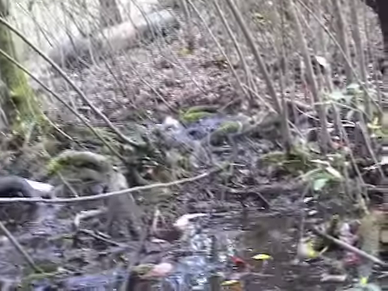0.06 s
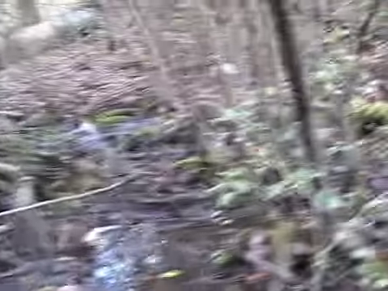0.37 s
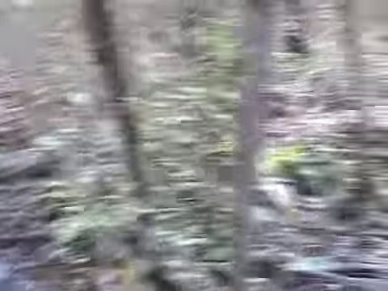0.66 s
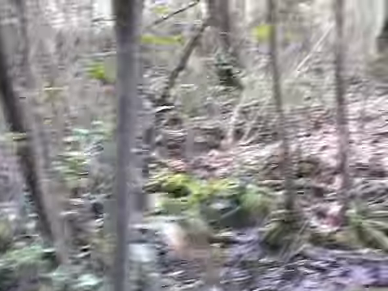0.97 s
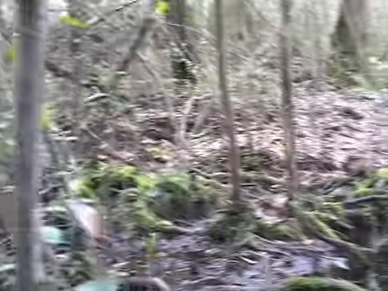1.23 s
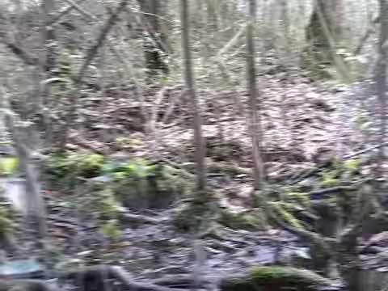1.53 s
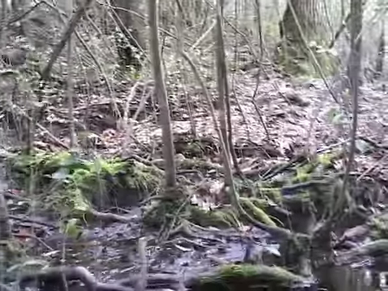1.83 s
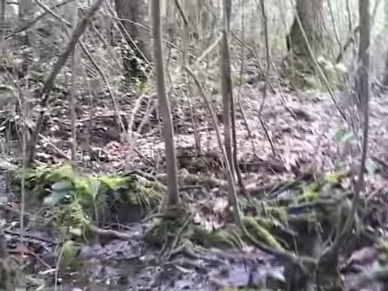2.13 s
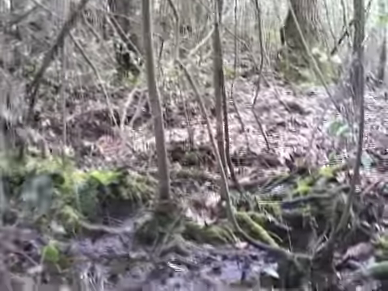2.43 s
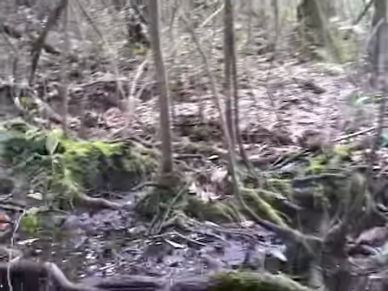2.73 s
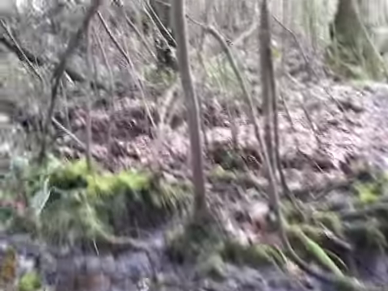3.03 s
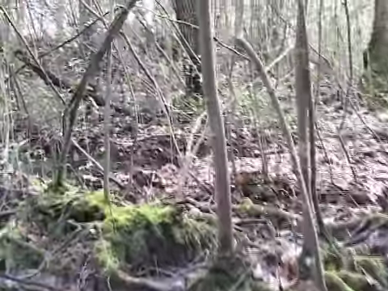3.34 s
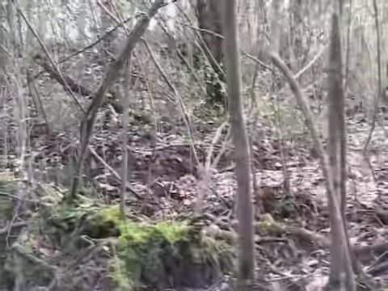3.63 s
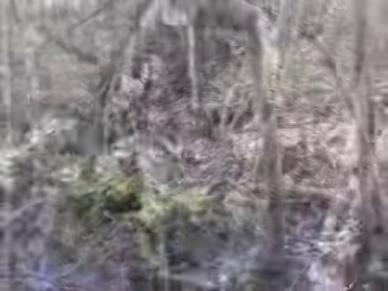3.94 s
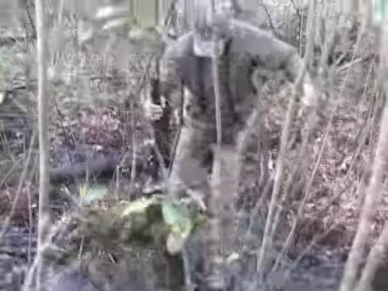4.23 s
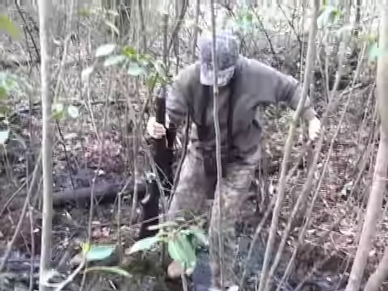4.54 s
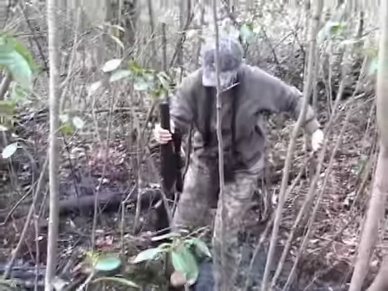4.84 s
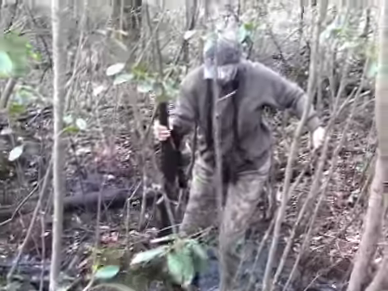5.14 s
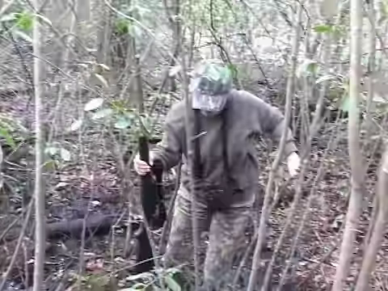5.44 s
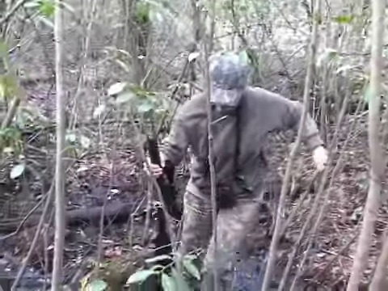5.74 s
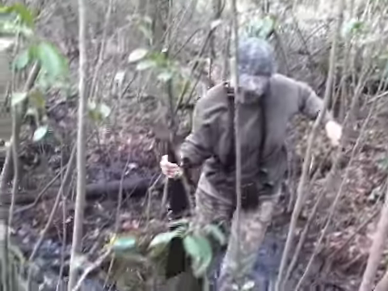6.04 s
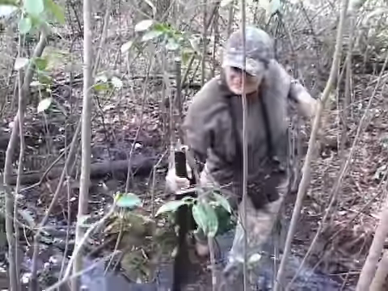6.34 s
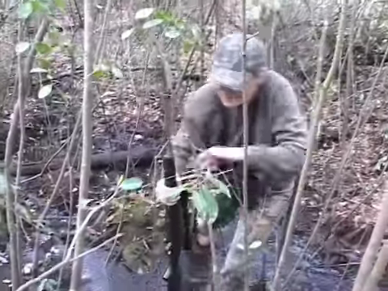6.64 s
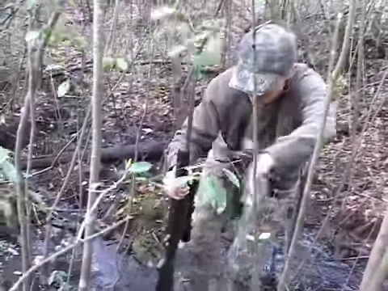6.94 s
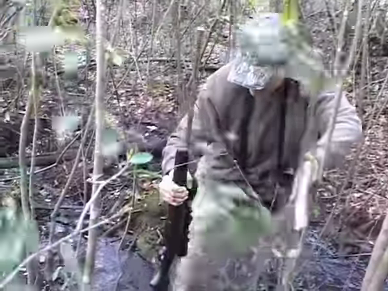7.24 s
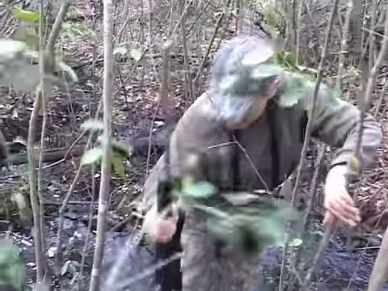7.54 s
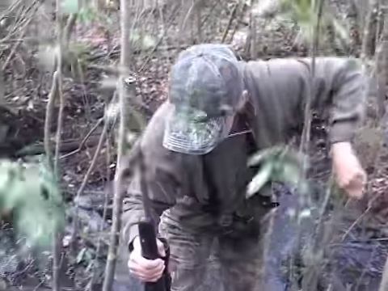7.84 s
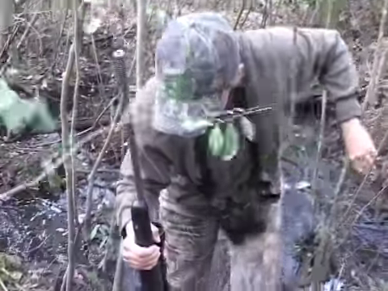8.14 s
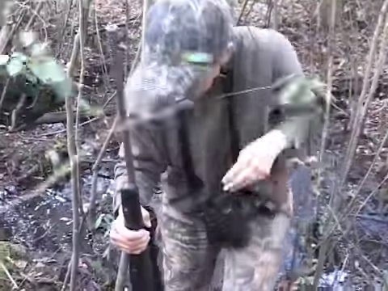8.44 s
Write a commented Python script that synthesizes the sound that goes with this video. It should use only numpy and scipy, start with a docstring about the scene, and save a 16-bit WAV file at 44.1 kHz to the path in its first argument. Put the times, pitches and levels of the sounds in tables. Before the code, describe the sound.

Someone wades through a boggy wood, with leaves rustling, twigs snapping, boots squelching in mud and one loud knock on wood.

```python
"""Someone wades through a boggy wood towards a handheld camera, over a low outdoor rumble.
From the first steps, leaves rustle by friction, twigs snap and stems crunch by brittle fracture.
Near 0.8 s a hard knock excites the modes of damp wood, and air pockets resonate in the mud.
Around 3 s the lens motor whirs, and softer knocks follow. Towards 6 s the boots squelch again, with a
cluster of bubbles; the brush crackles on to the end. Throughout, the trunks scatter every crack."""
import sys
import numpy as np
from scipy import signal
from scipy.fft import rfft, irfft, next_fast_len
from scipy.io import wavfile
from scipy.ndimage import map_coordinates

SR = 44100
rng = np.random.default_rng(int(sys.argv[2]) if len(sys.argv) > 2 else 0)


def persist_wave(psi):
    """Save psi, clipped to +-1, as 16-bit WAV."""
    counts = np.round(np.clip(psi, -1, 1) * 32767).astype(np.int16)
    wavfile.write(sys.argv[1], SR, np.atleast_2d(counts).T)


N = 383392

# Event levels are relative within a source; pan_db is left minus right.
# legs and sleeves sweeping through the brush: start_s, length_s, level_db
BRUSH_SWEEPS = [(0.38, 0.048, -55), (0.58, 0.24, -55.5), (1.39, 0.33, -60.5), (1.70, 0.29, -58),
                (2.83, .12, -61), (3.08, 0.7, -65.5), (3.85, 0.093, -55), (4.17, 0.46, -53),
                (5.6, 0.13, -55), (5.78, 0.18, -49), (6.2, 0.1, -57.5), (6.38, .29, -52),
                (6.88, 0.45, -55.5), (7.42, 0.097, -51), (7.73, 0.37, -52), (8.1, 0.44, -56)]
# where the brush is stirred: time_s, pan_db
BRUSH_PAN = [(0, -2.5), (1.5, -7), (2.2, -0.5), (3.0, -4), (3.9, -2.5), (4.3, 0.5), (6.7, 1), (7.4, 2.5),
             (8.0, -1), (8.6, 3.5)]
# boots pressing into the mud or pulling free: start_s, length_s, level_db
BOOT_TREADS = [(0.665, 0.13, -45.5), (0.86, 0.055, -54.5), (1.73, .31, -61), (2.60, 0.037, -58),
               (2.83, 0.075, -58.5), (3.12, 0.081, -59), (3.32, 0.05, -56), (3.57, .09, -66),
               (3.85, 0.2, -57), (4.3, 0.43, -61.5), (5.61, 0.2, -55), (5.87, .14, -50.5), (6.5, 0.36, -59),
               (7.89, 0.24, -58.5), (8.3, 0.18, -60)]
# twigs breaking: start_s, level_db, relative_body_db
TWIG_SNAPS = [(0.2478, -26, -37), (0.4407, -34, -28), (1.4326, -35, -42), (1.5, -42.5, -16),
              (1.5522, -37, -27), (1.634, -40.5, -19), (1.7379, -51, -2.5), (1.7784, -53, -3),
              (1.928, -35.5, -22.5), (1.933, -41, -12), (2.094, -42, -25), (2.3958, -48.5, -7.5),
              (2.821, -35, -35), (3.0834, -29.5, -27.5), (3.6596, -39, -27), (4.1619, -25.5, -23.5),
              (4.1829, -28.5, -36), (4.2016, -35, -27), (4.3936, -32.5, -30), (4.4278, -21.5, -39),
              (5.468, -41.5, -24), (5.5248, -22, -29.5), (5.5529, -34, -20), (5.826, -45.5, -7),
              (7.3474, -38, -21.5), (7.4727, -38, -25), (8.0344, -32.5, -25), (8.4067, -35.5, -25),
              (8.61, -36.5, -29)]
# bundles of stems crushed: start_s, level_db, t60_s
STEM_CRUNCHES = [(0.424, -40, 0.04), (0.437, -31, 0.019), (0.741, -38, 0.046), (1.413, -43.5, 0.056),
                 (2.016, -33.5, 0.022), (4.164, -40.5, 0.11), (4.176, -36, 0.085), (5.530, -25, 0.028),
                 (7.424, -32.5, 0.048), (7.446, -27, 0.036), (7.454, -31.5, 0.1)]
# knocks on wood: start_s, level_db, brightness_db, pan_db
WOOD_KNOCKS = [(0.2494, -37.5, -24, -9), (0.5937, -30.5, -22, -12), (0.7828, -6.5, -11.5, -4),
               (1.215, -37.5, -39, -2), (3.633, -36, -21, -7), (3.78, -30.5, -5.5, -3),
               (3.854, -27.5, -7, -4), (3.885, -30, -11.5, -5), (4.044, -27, -3.5, -4.5),
               (6.728, -32, -7, -1)]
# normal modes of the wood: pitch_hz, level_db, t60_s
WOOD_MODES = [(250, -9, .03), (455, -7, .03), (705, -1, .03), (910, -2, .02), (1292, 0, .03),
              (1905, -2.5, .025), (2650, -4, .014), (2950, -3.5, .014), (3515, -6, .017), (4400, -10, .012),
              (5920, -6, .016)]
# air pockets bursting in the mud: start_s, level_db, pitch_hz
AIR_POCKETS = [(0.684, -40, 2300), (0.725, -45, 1080), (0.889, -33, 1020), (0.897, -37, 897),
               (0.958, -42.5, 1010), (0.979, -45.5, 1140), (1.214, -44, 613), (3.368, -47, 960),
               (3.887, -41.5, 3100), (3.932, -42, 2180), (4.044, -37.5, 555), (4.249, -45, 1530),
               (5.634, -47, 507), (5.723, -37.5, 1340), (5.728, -35.5, 1540), (5.749, -39.5, 1230),
               (5.79, -46.5, 703), (5.931, -34, 1216), (5.998, -45, 1210), (6.035, -36.5, 3240),
               (6.826, -44.5, 976)]
# spectrum of the splash round a pocket: pitch_ratio, level_db
SPLASH_SHAPE = [(.25, -16.5), (1, 7.5), (1.8, -7), (2.7, -6.5), (4.5, -36.5)]
# weight landing on soft ground: start_s, level_db
FOOTFALLS = [(0.249, -31), (0.593, -28), (1.215, -48), (4.163, -52), (5.53, -33), (5.553, -38.5),
             (8.63, -43)]
# thin stalks springing free: start_s, level_db, pitch_hz
STALK_FLICKS = [(0.470, -48, 6440), (3.335, -41.5, 6200), (5.017, -43, 4960), (5.146, -44.5, 4840),
                (5.256, -48, 7200), (6.079, -34.5, 5030), (6.639, -33, 4950), (7.6, -38, 3440),
                (7.822, -39, 7670), (7.895, -35.5, 5600)]
# runs of the zoom motor: start_s, length_s, level_db
ZOOM_RUNS = [(1.9, 1, -83), (2.82, 0.59, -60), (3.09, 0.584, -55)]
# slow drift of the rumble: time_s, level_db
RUMBLE_DRIFT = [(0, -65), (1.7, -62.5), (3.0, -63.5), (4.9, -69.5), (8.69, -67)]
# spectral densities: frequency_hz, level_db
LEAF_SPECTRUM = [(150, -25.5), (400, -16.5), (1000, -7), (1600, -5.5), (2300, -4), (3400, -6.5), (5300, 0),
                 (7500, -2.5), (9200, -7), (10600, -16.5), (12000, -32)]
MUD_SPECTRUM = [(100, -13.5), (220, -6), (450, -2.5), (1000, 0), (1600, -8), (2700, -3), (4500, -6),
                (10000, -43)]
TWIG_SPECTRUM = [(150, -12), (800, -10), (2200, -11.5), (3600, 0), (6000, 5), (8000, 2), (9500, -3.5),
                 (11000, -13), (12000, -37)]
WOODY_BODY_SPECTRUM = [(60, -44), (180, -8.5), (500, 0), (1300, -3.5), (2500, -4.5), (6000, -9),
                       (12000, -30)]
STEM_SPECTRUM = [(150, -28), (800, -1), (1800, -1.5), (3200, 2), (5500, 2), (8000, 0.5), (10000, -8),
                 (12000, -29)]
MOTOR_SPECTRUM = [(150, -30), (400, 3), (600, -2), (1000, 1), (1900, -10.5), (2400, -12.5), (3600, 1),
                  (5100, 2.5), (5750, -15), (7200, 0.5), (9600, -14), (12000, -38)]
RUMBLE_SPECTRUM = [(15, -31), (30, -15.5), (50, -5.5), (75, 0), (110, -4), (170, -10), (300, -17.5),
                   (600, -20), (1200, -24.5), (4000, -46.5)]
HISS_SPECTRUM = [(100, -16), (400, 5.5), (1000, -13.5), (2000, -7.5), (4000, -4.5), (7000, -2.5),
                 (9500, -10.5), (12000, -52)]
SCATTER_SPECTRUM = [(200, 12), (1500, -7), (5000, 2.5), (10000, 5.0)]
# decay of the scatter from the trunks: frequency_hz, t60_s
TRUNK_DECAY = [(200, 0.098), (1000, 0.13), (5000, 0.17), (10000, 0.13)]
# likeness of left and right: frequency_hz, correlation
STEREO_COHERENCE = [(30, 0.97), (80, 0.77), (600, 0.69), (1200, 0.63), (2600, 0.23), (5500, 0.36),
                    (11000, 0.044)]

BAND_LIMIT_HZ = 11900


def leaves(level_db, pan_db):
    """Friction: leaves scrape past legs and sleeves, with pitched ticks and crackle on a soft swish."""
    pings = grains(pitch_hz=5700, spread_octaves=.45, cycles=13, scatter_db=3.8, rise=0, count=3600)
    ticking = unit(spread(coloured(pings, LEAF_SPECTRUM)))
    crackle = unit(spread(coloured(ticks(N, per_s=1300, scatter_db=5), LEAF_SPECTRUM)))
    clumps = amp(2 * wobble(knots_per_s=50))
    texture = amp(-5) * ticking + amp(-4) * crackle + amp(-6.5) * stereo_noise(LEAF_SPECTRUM)
    return amp(level_db) * sides(pan_db) * clumps * texture


def rustle_db():
    """Incoherent sources add in power: leaves are stirred, swept aside and shaken by breaking twigs."""
    approach_db_per_s = 1  # louder as the walker nears
    stirred = amp(-69.5 + approach_db_per_s * np.arange(N) / SR) ** 2
    swept = stroke_power(BRUSH_SWEEPS, swell_share=0.12, t60_s=0.71)
    shakes = [(start_s, .005, level_db - 22.5) for start_s, level_db, _ in TWIG_SNAPS]
    shaken = stroke_power(shakes, swell_share=0.83, t60_s=0.35)
    return 10 * np.log10(stirred + swept + shaken)


def mud():
    """Bubble resonance: boots press water through the litter, raising a froth on a wet slosh."""
    seeping = amp(-64.5) ** 2  # water trickles back into the footprints
    level_db = 10 * np.log10(seeping + stroke_power(BOOT_TREADS, swell_share=0.089, t60_s=0.22))
    bubbles = grains(pitch_hz=1550, spread_octaves=.55, cycles=13, scatter_db=4, rise=.25, count=7000)
    # the harder the boot presses, the more air it squeezes out
    froth = amp(np.clip(0.12 * (level_db + 42), -8, 2)) * unit(spread(bubbles))
    slosh = unit(spread(coloured(ticks(N, per_s=2700, scatter_db=6), MUD_SPECTRUM)))
    return amp(level_db - 2) * sides(-1.5) * (froth + slosh)


def twig_snaps():
    """Brittle fracture: an impulse and a spray of tearing fibres excite the stick's resonance."""
    t = np.arange(SR // 10) / SR
    sharp, body = np.zeros((2, N)), np.zeros((2, N))
    pitches_hz = 5350 * 2 ** (0.26 * rng.standard_normal(len(TWIG_SNAPS)))
    for (start_s, level_db, body_db), pitch_hz in zip(TWIG_SNAPS, pitches_hz):
        fibres = ticks(len(t), per_s=9000, scatter_db=4) * decay(t, t60_s=0.026)
        impulse = amp(3.5 + 0.27 * (level_db + 31.5)) * (t == 0)  # stands out more in a strong twig
        crack = impulse + amp(-0.5) * fibres * onset(t, attack_s=0.00084)
        stick = np.sin(2 * np.pi * pitch_hz * t) * decay(t, t60_s=.002)
        ring = amp(-15) * filtered(crack, stick)
        add(sharp, start_s, amp(level_db) * bearing(start_s) * (crack + ring))
        add(body, start_s, amp(level_db + body_db) * bearing(start_s) * crack.sum(0))
    return coloured(sharp, TWIG_SPECTRUM) + amp(11.5) * coloured(body, WOODY_BODY_SPECTRUM)


def stem_crunches():
    """Superposed fractures: many thin stems break together under a boot, over a woody body."""
    t = np.arange(SR // 4) / SR
    sharp, body = np.zeros((2, N)), np.zeros((2, N))
    for start_s, level_db, t60_s in STEM_CRUNCHES:
        envelope = decay(t, t60_s) * onset(t, attack_s=0.00064)
        burst = amp(level_db) * envelope * ticks(len(t), per_s=5500, scatter_db=9.5)
        add(sharp, start_s, bearing(start_s) * burst)
        add(body, start_s, bearing(start_s) * burst.sum(0))
    return amp(-1) * coloured(sharp, STEM_SPECTRUM) + amp(-18) * coloured(body, WOODY_BODY_SPECTRUM)


def twiglets(level_db, pan_db):
    """A Poisson process: tiny twigs crack at random, as hard as the brush is being pushed."""
    t = np.arange(SR // 100) / SR
    tear = (t == 0) + amp(-9) * noise_burst(t, t60_s=0.016)
    breaks = ticks(N, per_s=12, scatter_db=2.5)[:1]
    cracks = signal.fftconvolve(breaks, tear, axes=1)[:, :N]
    return amp(level_db - 9) * sides(pan_db) * unit(coloured(cracks, TWIG_SPECTRUM))


def wood_knocks():
    """Modal vibration: damp wood rings briefly, and a harder contact excites its upper modes more."""
    t = np.arange(SR // 10) / SR
    mode_hz, mode_db, t60_s = np.transpose(WOOD_MODES)[:, :, None]
    # each mode reaches left and right slightly out of step
    lead_s = np.array([-.0003, .0003])[:, None, None]
    modes = np.sin(2 * np.pi * mode_hz * t + lead_s * mode_hz) * decay(t, t60_s)
    out = np.zeros((2, N))
    for start_s, level_db, brightness_db, pan_db in WOOD_KNOCKS:
        tilt_db = 0.47 * (brightness_db + 13.5) * np.log2(mode_hz / 900)
        gains = amp(mode_db + tilt_db + rng.standard_normal(mode_hz.shape))
        ring = np.sum(gains * modes, 1) / np.linalg.norm(gains) * onset(t, attack_s=.0001)
        contact = coloured(noise_burst(t, t60_s=0.028), STEM_SPECTRUM)
        knock = amp(-2) * ring + amp(brightness_db - 4.5) * contact
        add(out, start_s, amp(level_db) * sides(pan_db) * knock)
    # the knocks carry no deep bass
    return signal.sosfilt(signal.butter(2, 220, "highpass", fs=SR, output="sos"), out)


def air_pockets():
    """Bubble resonance: large pockets ring lower and longer, rising in pitch as they near the surface."""
    t = np.arange(SR // 6) / SR
    ring_cycles = 38
    out = np.zeros((2, N))
    for start_s, level_db, pitch_hz in AIR_POCKETS:
        note = damped_ring(t, pitch_hz, t60_s=ring_cycles / pitch_hz, rise=.18, attack_s=.0005)
        spectrum = [(ratio * pitch_hz, band_db) for ratio, band_db in SPLASH_SHAPE]
        splash = coloured(noise_burst(t, t60_s=0.079, channels=1), spectrum)
        add(out, start_s, amp(level_db) * sides(-1.8) * (note + amp(-6.5) * splash))
    return out


def ground_thuds():
    """Heavy damping: soft ground takes the walker's weight with one low push."""
    t = np.arange(SR // 8) / SR
    thud = damped_ring(t, pitch_hz=186, t60_s=0.014, rise=0.24, attack_s=0.00039)
    out = np.zeros((2, N))
    for start_s, level_db in FOOTFALLS:
        add(out, start_s, amp(level_db) * bearing(start_s) * thud)
    return out


def stalk_flicks():
    """Free vibration: a released stalk ticks at its own natural frequency, with a dry scuff."""
    t = np.arange(SR // 30) / SR
    out = np.zeros((2, N))
    for start_s, level_db, pitch_hz in STALK_FLICKS:
        note = np.sin(2 * np.pi * pitch_hz * t) * decay(t, t60_s=0.02)
        scuff = coloured(noise_burst(t, t60_s=0.025), TWIG_SPECTRUM)
        add(out, start_s, amp(level_db) * bearing(start_s) * (amp(-2.5) * note + amp(-11) * scuff))
    return out


def zoom_motor():
    """Amplitude modulation: a fine gear rattle roughens the whir of the lens drive."""
    running = np.sqrt(stroke_power(ZOOM_RUNS, swell_share=0.073, t60_s=0.28))
    rattle = amp(wobble(knots_per_s=60))
    return running * rattle * sides(-0.88) * stereo_noise(MOTOR_SPECTRUM)


def trunk_scatter(sound):
    """Multiple scattering: trunks and branches return a short, thin, bright tail."""
    hz, t, bands = signal.stft(rng.standard_normal((2, SR // 2)), SR, nperseg=256)
    bands = bands * decay(t, at_frequency(TRUNK_DECAY, hz)[:, None])
    tail = coloured(signal.istft(bands, SR, nperseg=256)[1], SCATTER_SPECTRUM)
    delayed = np.pad(sound, ((0, 0), (SR // 300, 0)))
    return signal.fftconvolve(delayed, tail / np.linalg.norm(tail[0]), axes=1)[:, :N]


def outdoors():
    """Ambient noise: a wavering distant rumble under a thin, even hiss."""
    rumble_db = curve(RUMBLE_DRIFT) + 4 + 0.63 * wobble(knots_per_s=8)
    rumble = amp(rumble_db) * sides(-2.6) * stereo_noise(RUMBLE_SPECTRUM)
    return rumble + amp(-65) * stereo_noise(HISS_SPECTRUM)


def stroke_power(rows, swell_share, t60_s):
    """Power summation of movements that each swell for a share of their length, hold and die away."""
    t = np.arange(N) / SR
    power = np.zeros(N)
    for start_s, length_s, level_db in rows:
        swell = np.clip((t - start_s) / (swell_share * length_s), 0, 1)
        fade = decay(np.clip(t - start_s - length_s, 0, 2), t60_s)
        power += (amp(level_db) * swell * fade) ** 2
    return power


def grains(pitch_hz, spread_octaves, cycles, scatter_db, rise, count):
    """Shot noise: two streams of tiny damped rings of random time, pitch and size, rms 1."""
    when = rng.random(count)
    detune, size = np.clip(rng.standard_normal((count, 2)), -2.3, 2.3).T
    hz = np.minimum(pitch_hz * 2 ** (spread_octaves * detune), BAND_LIMIT_HZ)[:, None]
    t = np.arange(int(1.5 * cycles * SR / pitch_hz) + 8) / SR
    rings = amp(scatter_db * size)[:, None] * damped_ring(t, hz, cycles / hz, rise, attack_s=.5 / hz)
    slots = ((when * 2 * N).astype(int)[:, None] + np.arange(len(t))) % (2 * N)
    return unit(np.bincount(slots.ravel(), rings.ravel(), 2 * N).reshape(2, N))


def ticks(length, per_s, scatter_db):
    """Two Poisson trains of impulses of uneven size, rms 1."""
    present = rng.random((2, length)) < per_s / SR
    sizes = amp(scatter_db * np.clip(rng.standard_normal((2, length)), -2, 2))
    return unit(present * sizes * rng.choice([-1, 1], (2, length)))


def damped_ring(t, pitch_hz, t60_s, rise, attack_s):
    """A damped oscillator whose pitch climbs by the fraction rise as it dies."""
    phase = 2 * np.pi * pitch_hz * t * (1 + rise * np.minimum(t / t60_s, 1) / 2)
    return np.sin(phase) * decay(t, t60_s) * onset(t, attack_s)


def noise_burst(t, t60_s, channels=2):
    """Exponentially damped white noise."""
    return rng.standard_normal((channels, len(t))) * decay(t, t60_s)


def stereo_noise(spectrum):
    """Partly coherent Gaussian noise of the given spectrum, rms 1."""
    return unit(spread(coloured(rng.standard_normal((2, N)), spectrum)))


def spread(pair):
    """Mid-side mixing: two unrelated signals become alike in the bass and stay apart in the treble."""
    size = next_fast_len(N + 8192)
    angle = np.arccos(at_frequency(STEREO_COHERENCE, np.fft.rfftfreq(size, 1 / SR))) / 2
    mid, side = irfft(rfft(pair, size) * [np.cos(angle), np.sin(angle)], size)[:, :N]
    return np.array([mid + side, mid - side])


def coloured(sound, spectrum):
    """Minimum-phase filtering: folding the cepstrum gives a causal response with this spectrum."""
    size = 4096
    cepstrum = irfft(np.log(amp(at_frequency(spectrum, np.fft.rfftfreq(size, 1 / SR)))))
    cepstrum[1:size // 2] *= 2
    cepstrum[size // 2 + 1:] = 0
    return filtered(sound, irfft(np.exp(rfft(cepstrum))))


def filtered(sound, response):
    """Convolution with an impulse response scaled to unit energy."""
    return signal.fftconvolve(sound, response[None] / np.linalg.norm(response), axes=1)[:, :sound.shape[1]]


def decay(t, t60_s):
    """Exponential decay, 60 dB in t60_s."""
    return 1000 ** (-t / t60_s)


def onset(t, attack_s):
    """First-order rise with time constant attack_s."""
    return 1 - np.exp(-t / attack_s)


def wobble(knots_per_s):
    """Spline interpolation through random knots."""
    knots = rng.standard_normal(int(N * knots_per_s / SR) + 4)
    return map_coordinates(knots, [np.arange(N) * knots_per_s / SR])


def at_frequency(points, hz):
    """Interpolation on a logarithmic frequency axis."""
    knots_hz, values = np.transpose(points)
    return np.interp(np.log(hz + 1), np.log(knots_hz + 1), values)


def curve(points):
    """Linear interpolation in time, one value per sample."""
    return np.interp(np.arange(N) / SR, *np.transpose(points))


def bearing(time_s):
    """Level panning to where the brush is stirred at time_s."""
    return sides(np.interp(time_s, *np.transpose(BRUSH_PAN)))


def sides(pan_db):
    """Left and right gains for a level difference."""
    return amp(np.array([[.5], [-.5]]) * pan_db)


def add(track, start_s, sound):
    """Superposes a sound on a track."""
    part = track[:, round(start_s * SR):][:, :sound.shape[-1]]
    part += sound[..., :part.shape[1]]


def amp(db):
    """Decibels to amplitude ratio."""
    return 10 ** (np.asarray(db) / 20)


def unit(sound):
    """Normalisation to rms 1."""
    return sound / np.sqrt(np.mean(sound ** 2) + 1e-20)


def scene():
    """Superposition of the walker, the close knocks, their scatter, the lens and the outdoor noise."""
    brush_db, pan_db = rustle_db(), curve(BRUSH_PAN)
    breaking = twig_snaps() + stem_crunches() + twiglets(brush_db, pan_db)
    close = wood_knocks() + air_pockets() + ground_thuds() + stalk_flicks()
    scatter = trunk_scatter(amp(-6) * breaking + amp(-13) * close)
    wading = leaves(brush_db, pan_db) + mud()
    return breaking + close + scatter + wading + zoom_motor() + outdoors()


def record(dry):
    """Band limiting: a steep low-pass removes the highest treble."""
    size = next_fast_len(N + SR // 2)
    lowpass = 1 / (1 + (np.fft.rfftfreq(size, 1 / SR) / BAND_LIMIT_HZ) ** 120)
    return irfft(rfft(dry, size) * lowpass, size)[:, :N]


dry = scene()
out = record(dry)
persist_wave(out)
```